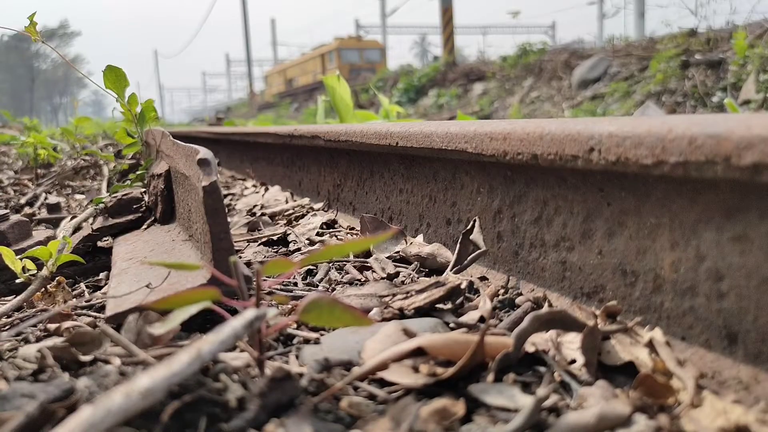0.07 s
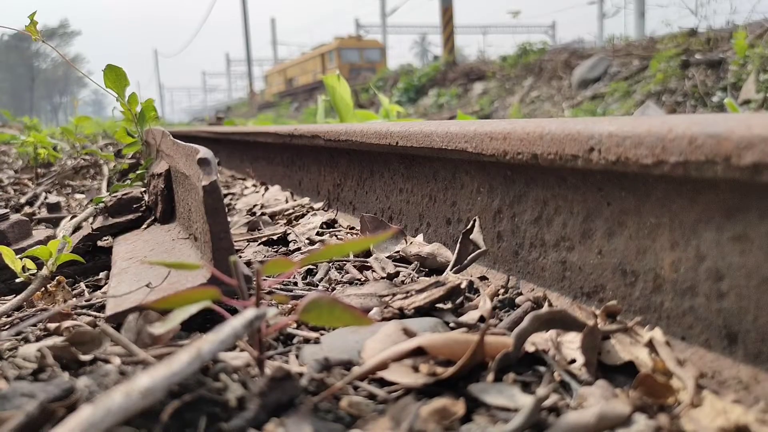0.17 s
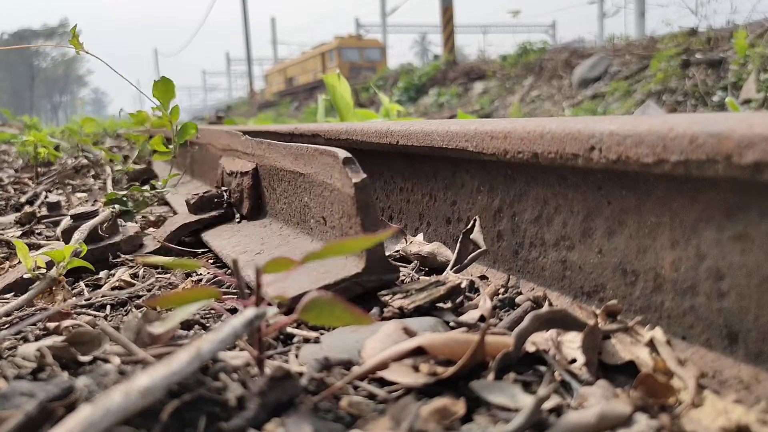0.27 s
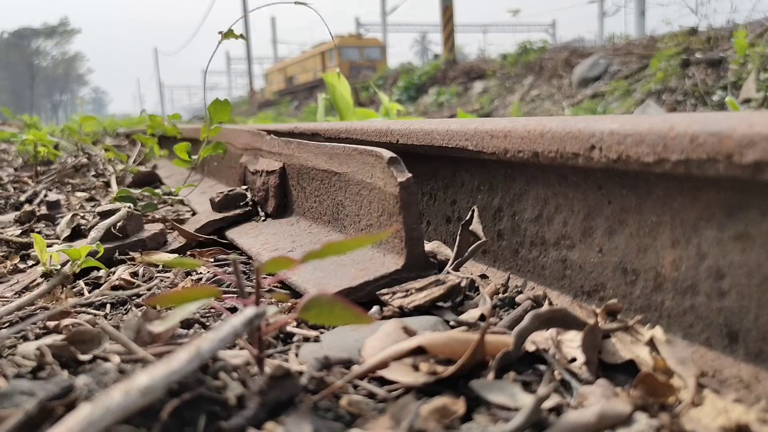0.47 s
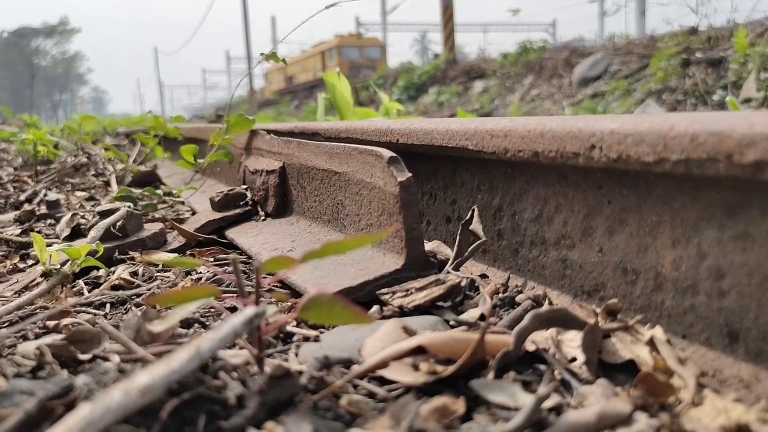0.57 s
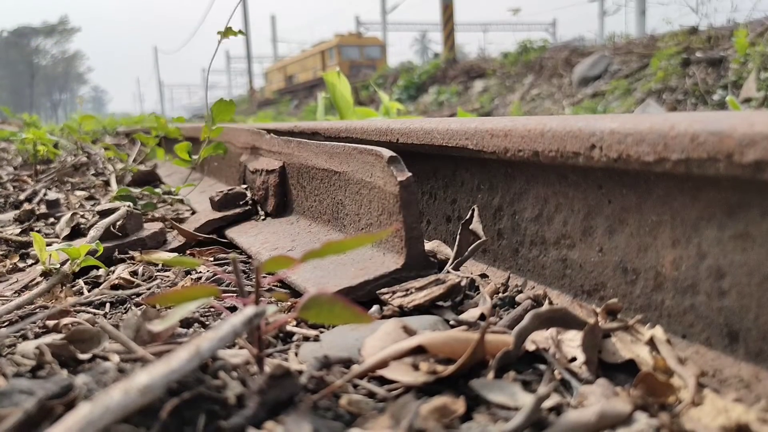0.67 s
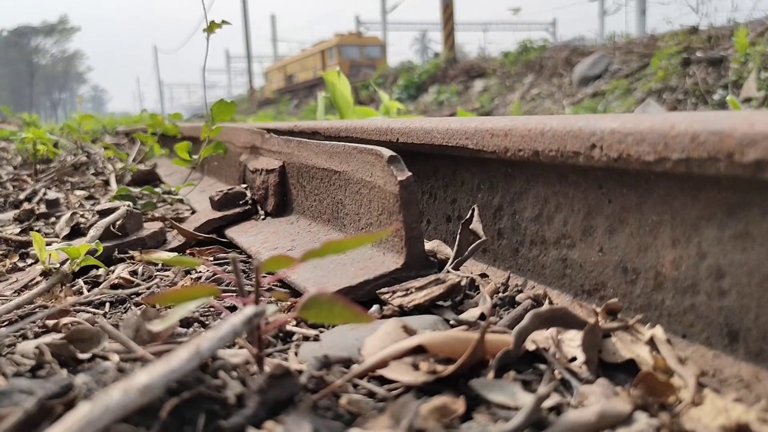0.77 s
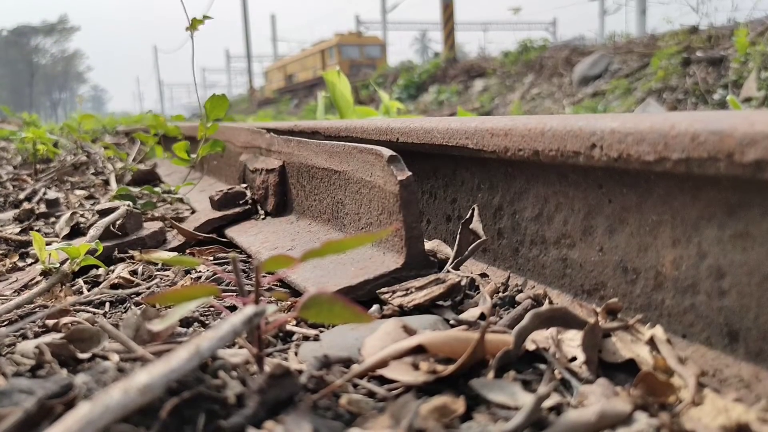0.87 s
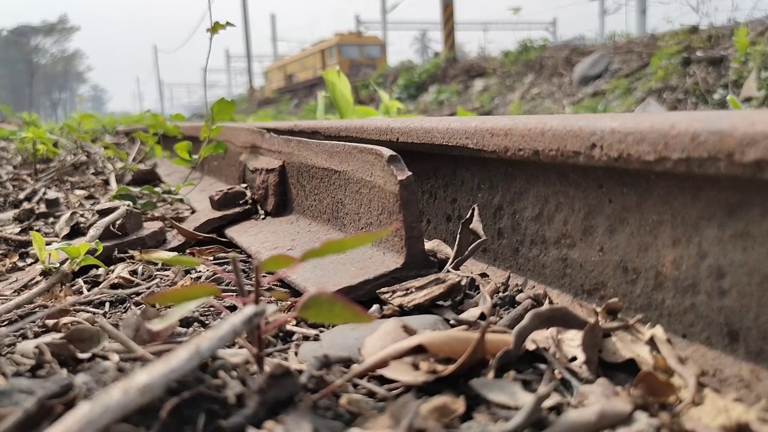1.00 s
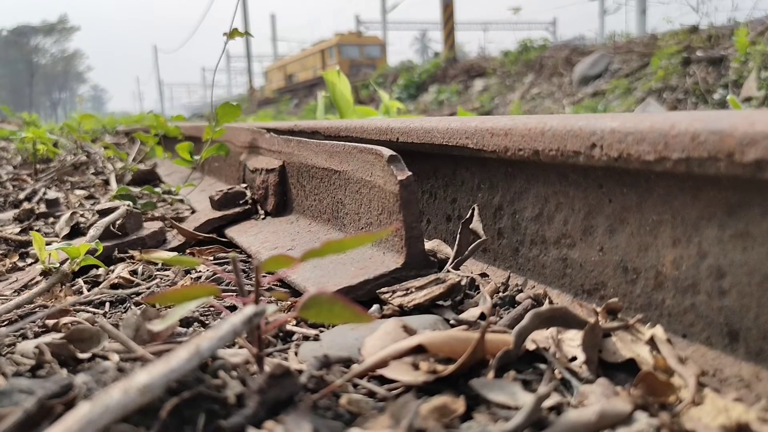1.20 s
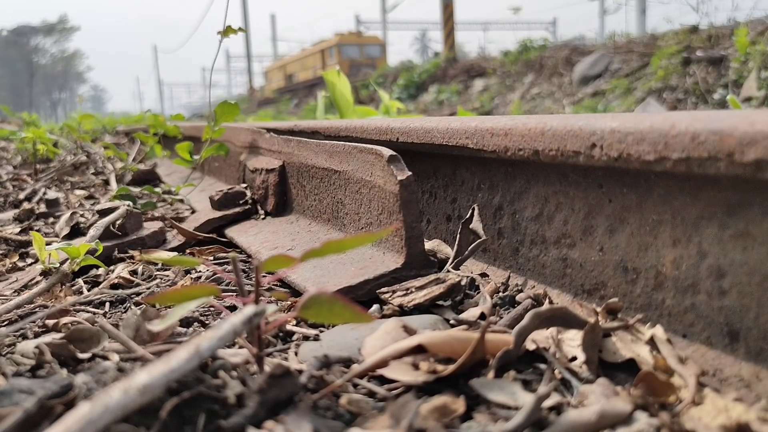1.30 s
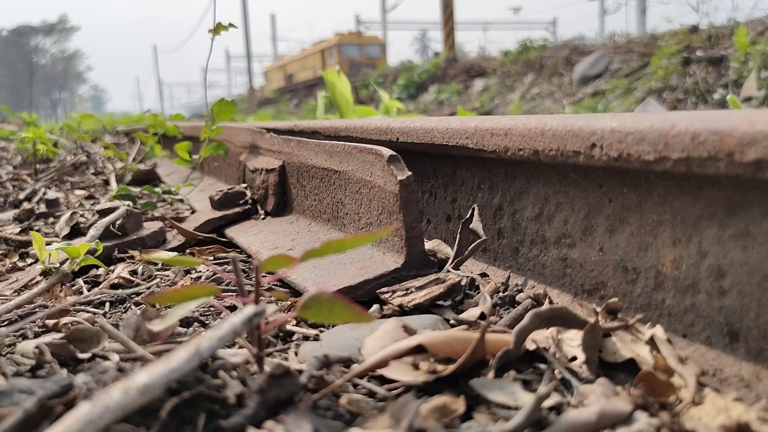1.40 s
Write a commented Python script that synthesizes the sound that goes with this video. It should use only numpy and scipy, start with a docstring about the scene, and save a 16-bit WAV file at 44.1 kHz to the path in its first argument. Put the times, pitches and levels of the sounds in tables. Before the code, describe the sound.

Metal clank and short scrape of a railway track switch shifting over, outdoors.

```python
"""Steel blade of a rusty railway switch, thrown once; heard from the ballast beside the rail.
It drags, breaks loose with a clack, judders and squeaks over its slide plates, slams home.
Each blow drives modes of blade, sleeper and rail; rust grains catch, slip and crack.
The linkage knocks softly before and after. Stones and bank scatter the sound.
Background: faint outdoor air, thin hiss, low rumble, a far drone and far chirps."""
import sys
import numpy as np
from scipy import signal
from scipy.fft import rfft, irfft
from scipy.io import wavfile
from scipy.ndimage import uniform_filter1d

SR = 44100
rng = np.random.default_rng(int(sys.argv[2]) if len(sys.argv) > 2 else 0)


def persist_wave(psi):
    """Save psi, clipped to +-1, as 16-bit WAV."""
    counts = np.round(np.clip(psi, -1, 1) * 32767).astype(np.int16)
    wavfile.write(sys.argv[1], SR, np.atleast_2d(counts).T)


N = 63945

RELEASE_S, SLAM_S = 0.2432, 0.3885
LEFT_LAG_S, COHERENCE = 0.0004953, 0.66
LAGS_S = np.array([[LEFT_LAG_S], [0]])

# Blade blows: t/s, thud level/dB, body level/dB, clang level/dB, L-R/dB (all relative)
BLOWS = [(0.2425, -41, -28, -24.5, 1.5), (0.2505, -46.5, -26, -25.5, 8), (0.2566, -35.5, -24.5, -10.5, -2),
         (0.264, -49, -32, -21, -4.5), (0.272, -18, -18.5, -12, 1), (0.276, -28, -19.5, -17.5, 3),
         (0.281, -37, -32.5, -22, -0.5), (0.289, -35.5, -22.5, -23, -1), (0.301, -20, -21.5, -21.5, 0),
         (0.313, -29.5, -28.5, -12.5, 6.5), (0.32, -22, -26, -19.5, 2.5), (0.332, -29, -27.5, -23, 4.5),
         (0.346, -22, -24, -22, -2), (0.3628, -30.5, -22.5, -29.5, -6), (0.3683, -31, -22.5, -24.5, 6),
         (0.3838, -24, -13, -36, -1.5), (0.3903, -33, -19, -25, -4.5), (0.3971, -23.5, -25, -35.5, -3),
         (0.407, -29.5, -24, -37, -4), (0.426, -35, -25, -35.5, -2), (0.438, -39, -37, -56, 0),
         (0.452, -40.5, -58, -55, 11)]
# Spectra of a blow's unpitched parts: f/Hz, relative level/dB
THUD_SPECTRUM = [(20, -47), (55, -25), (100, -8), (150, -3), (190, -9), (260, 1.5), (340, -10),
                 (600, -33.5), (2000, -79)]
BODY_SPECTRUM = [(100, -36.5), (250, -10), (380, -5.5), (540, -1.5), (700, 5.5), (790, -1.5), (1000, -7.5),
                 (1500, -35.5), (4000, -57)]
CLANG_SPECTRUM = [(300, -31), (800, -0.5), (1300, 4.5), (1850, 0), (2500, -11.5), (3200, -8), (4200, -25.5),
                  (5200, -35), (9000, -35.5), (16000, -70.5)]
# Modes of blade with sleeper, and of the rail: f/Hz, relative level/dB, t60/s
BLADE_MODES = [(107, -12.5, 0.1), (191.5, -5.5, 0.18), (259, -4.5, .13), (400, -4.5, 0.087),
               (468, -19.5, 0.31), (717, -2.5, 0.053), (790, -3, 0.059)]
RAIL_MODES = [(645, -11, .12), (679, -12.5, 0.14), (724, -17.5, .16), (786, -6, 0.064), (1158, -11, 0.069),
              (1207, -11, 0.083), (1273, -13, .07), (1330, -8, 0.18), (1505, -16, .07), (1645, -14, 0.044),
              (1735, -7, 0.064), (1820, -15.5, 0.078), (1938, -15, 0.14), (2195, -19, 0.062),
              (3110, -14.5, .06)]
# Heel landings: t/s, level/dB, f/Hz
HEEL_KNOCKS = [(0.2505, -11, 726), (0.2735, -18.5, 666), (0.3625, -11, 691), (0.3968, -15, 684.3),
               (0.4255, -23, 688)]
# Bright steel modes at release, at the slam, and lingering after it: f/Hz, level/dB, t60/s
RELEASE_MODES = [(4074, -36.5, .06), (6036, -32, .075), (6660, -23, 0.046), (7960, -34, 0.036),
                 (9000, -36, .05), (10640, -43.5, 0.048), (12130, -45, .05), (14800, -40, .04)]
SLAM_MODES = [(980, -14.5, .085), (2042, -22.5, 0.11), (2203, -21.5, 0.044), (2480, -21, .06),
              (3034, -23.5, 0.051), (3680, -37.5, 0.056), (4400, -31.5, 0.043), (6490, -25, 0.0285),
              (7304, -27, 0.026), (8250, -37, .03), (10430, -28, 0.015), (12850, -39.5, .03)]
LINGERING_MODES = [(3030, -59.5, .35), (4414, -46.5, .33), (5012, -46, .16), (6100, -54, 0.27),
                   (7270, -49, .29), (7750, -63, .27), (8140, -60, 0.3)]
# Rust crushed between steel faces: t/s, level/dB, hold/s
CRACKS = [(0.2415, -27.5, 0.004), (0.2596, -39, 0.003), (0.388, -20, 0.0034)]
# Stick-slip squeaks: t/s, length/s, f/Hz, level/dB
SQUEAKS = [(0.3455, 0.018, 980, -7.5)]
# Spectra of rust cracking, blade grinding, rust scraping: f/Hz, relative level/dB
CRACK_SPECTRUM = [(800, -13), (2500, 2), (4300, -2), (5500, -15.5), (6450, 1.5), (7000, -5.5), (8500, -8),
                  (10400, -12.5), (11200, -19.5), (15500, -24)]
GRIND_SPECTRUM = [(40, -30.5), (105, -3), (160, -14), (350, -13), (580, -8.5), (720, 5), (830, -4.5),
                  (1050, -24.5), (1300, -17), (1650, -17.5), (2300, -29.5), (2800, -57.5), (6600, -59),
                  (14000, -45.5)]
SCRAPE_SPECTRUM = [(1000, -13.5), (2500, 8), (4200, -2), (5200, -7.5), (6400, -2), (7800, -4.5),
                   (11000, -14), (13300, -9.5), (15500, -30.5)]
# Steel resonances fed by rubbing: f/Hz, half-width/Hz, relative level/dB
SING_PEAKS = [(2970, 29, 3.5), (3070, 100, -3.5), (3780, 60, -4), (4310, 30, -3), (4960, 61, -9),
              (6060, 230, -9), (6720, 36, 6.5)]
# Friction envelopes: t/s, level/dB
GRIND_ENVELOPE = [(0, -57), (0.04, -51.5), (0.07, -48.5), (0.11, -44.5), (0.16, -38), (0.19, -37.5),
                  (0.24, -34), (0.27, -62)]
SCRAPE_ENVELOPE = [(0.238, -74.5), (0.25, -32), (0.275, -38.5), (0.295, -46.5), (0.32, -47.5), (0.34, -38),
                   (0.385, -35.5), (0.41, -44.5), (0.43, -44.5), (0.5, -57.5)]
SING_ENVELOPE = [(0, -87), (0.12, -74), (0.18, -59), (0.235, -57.5), (0.26, -39), (0.34, -54), (0.41, -48),
                 (0.48, -50), (0.6, -93), (0.8, -104), (1.0, -120)]
# Linkage knocks: t/s, level/dB, f/Hz
ROD_KNOCKS = [(0.080, -43, 805), (0.088, -33.5, 750), (0.131, -36, 740), (0.162, -38.5, 775),
              (0.177, -36.5, 820), (0.732, -51, 428), (1.25, -47, 499), (1.272, -52.5, 402.4)]
# Linkage knock spectrum: multiple of pitch, relative level/dB
ROD_SPECTRUM = [(.15, -33.5), (.45, -4.5), (.75, -3), (1, 9.5), (1.3, -16), (1.7, -17.5), (2.2, -18.5),
                (3.2, -45.5), (5.5, -63.5)]
# Decay curve of scatter from ballast and bank: f/Hz, t60/s
SCATTER_T60_S = [(80, 1.1), (300, -0.02), (800, 0.6), (2000, 0.93), (4000, 0.5458), (6500, 0.52),
                 (14000, 0.42)]
# Scatter gain: f/Hz, level/dB
SCATTER_SPECTRUM = [(80, -25.5), (300, -10), (800, -34), (2000, -25.5), (4000, -19), (6500, -15.5),
                    (14000, -18.5)]
# Background spectra: f/Hz, relative level/dB
AIR_SPECTRUM = [(20, -4.5), (58, 2), (110, -8), (165, -10), (220, -8), (300, 2.5), (520, 0), (900, -13.5),
                (1900, -19.5), (2800, -41.5), (5500, -47.5), (16000, -56)]
HISS_SPECTRUM = [(2500, -40), (5600, -32), (6400, -2.5), (6900, -19.5), (7600, 3), (8700, -9), (10200, -13),
                 (10900, -29.5), (12000, -14), (13000, -18), (14400, -33), (15200, -47)]
RUMBLE_SPECTRUM = [(15, -21), (35, -0.5), (58, -4), (100, -6), (170, -17.5), (400, -49.5), (2000, -77)]
# Air balance: f/Hz, L-R/dB
AIR_BALANCE_DB = [(60, 12), (200, -2.5), (380, -0.5), (700, 13), (2400, 18), (4400, 7), (8000, -9.5),
                  (13000, 24)]
# Air likeness between channels: f/Hz, coherence
AIR_COHERENCE = [(60, 0.27), (290, 0.95), (640, 0.42), (1400, 0.059), (15000, 0.27)]
# Background envelopes: t/s, level/dB
AIR_ENVELOPE = [(0, -53.5), (.75, -56.5), (1.02, -56.5), (1.12, -55.5), (1.28, -57.5), (1.45, -52.5)]
RUMBLE_ENVELOPE = [(0, -54.5), (0.36, -66), (0.42, -39), (0.5, -53), (0.65, -62), (0.8, -59), (1.0, -64.5),
                   (1.15, -52), (1.24, -56.5), (1.35, -74.5)]
# Far chirps: t/s, length/s
CHIRPS = [(0.849, 0.031), (0.893, 0.035), (1.103, 0.045)]


def blade_blows():
    """Unpitched part of each blow: sleeper thud, hollow body, steel clang."""
    out = np.zeros((2, N))
    for start_s, thud_db, body_db, clang_db, pan_db in BLOWS:
        thud = burst(THUD_SPECTRUM, rise_s=0.0019, hold_s=0.0084, t60_s=0.081, pan_db=2, steady=0.29)
        body = burst(BODY_SPECTRUM, rise_s=0.0036, hold_s=0.0062, t60_s=0.035, pan_db=4, steady=0.46)
        clang = burst(CLANG_SPECTRUM, rise_s=0.001, hold_s=0.0018, t60_s=0.059, pan_db=0.5, steady=0.4)
        blow = amp(thud_db - 5) * thud + amp(body_db - 1) * body + amp(clang_db - 1.5) * clang
        add(out, start_s, panned(blow, pan_db))
    return out


def blade_ring(rise_s=0.0012):
    """Damped blade and sleeper modes; thud drives the low ones, body the high ones."""
    t = np.maximum(np.arange(SR // 2) / SR - LAGS_S, 0)
    attack = np.minimum(t / rise_s, 1)
    out = np.zeros((2, N))
    for hz, db, t60_s in BLADE_MODES:
        ring = attack * amp(db - 60 * t / t60_s) * np.sin(2 * np.pi * hz * t)
        for start_s, thud_db, body_db, _, pan_db in BLOWS:
            force_db = at_hz([(260, thud_db), (600, body_db)], hz)
            add(out, start_s, panned(amp(force_db) * ring, pan_db))
    return out


def rail_clank(rise_s=0.0008, spread_db=2):
    """Each blow adds energy to the rail's modes, differently at each contact point."""
    t = np.arange(N) / SR
    out = np.zeros((2, N))
    for hz, db, t60_s in RAIL_MODES:
        decay = (np.minimum(t / rise_s, 1) * amp(db - 60 * t / t60_s))[None, :SR // 2]
        energy = np.zeros((1, N))
        for start_s, _, body_db, clang_db, _ in BLOWS:
            force_db = (body_db if hz < 1000 else clang_db) + spread_db * rng.standard_normal()
            add(energy, start_s, (amp(force_db) * decay) ** 2)
        out += np.sqrt(energy) * stereo_mode(t, hz)
    return panned(out, pan_db=2.5)


def heel_knocks():
    """The blade's heel lands: short, hollow, nearly pure knocks."""
    t = np.maximum(np.arange(SR // 4) / SR - LAGS_S, 0)
    shape = strike_envelope(t, rise_s=0.003, hold_s=0.0036, t60_s=0.033)
    out = np.zeros((2, N))
    for start_s, db, hz in HEEL_KNOCKS:
        add(out, start_s, amp(db) * shape * np.sin(2 * np.pi * hz * t))
    return panned(out, pan_db=4)


def steel_ring(start_s, modes, rise_s, hold_s):
    """Bright steel modes rung by one hard contact."""
    t = np.arange(SR * 3 // 4) / SR
    out = np.zeros((2, N))
    for hz, db, t60_s in modes:
        add(out, start_s, amp(db) * strike_envelope(t, rise_s, hold_s, t60_s) * stereo_mode(t, hz))
    return out


def clacks():
    """Release and slam: steel rings, crushed rust cracks."""
    out = steel_ring(RELEASE_S, RELEASE_MODES, rise_s=0.0048, hold_s=0.00073)
    out += steel_ring(SLAM_S, SLAM_MODES, rise_s=0.0023, hold_s=0.003)
    out += steel_ring(SLAM_S, LINGERING_MODES, rise_s=0.004, hold_s=0.0052)
    for start_s, db, hold_s in CRACKS:
        crack = burst(CRACK_SPECTRUM, rise_s=0.0042, hold_s=hold_s, t60_s=0.051, pan_db=-2, steady=0.93)
        add(out, start_s, amp(db) * crack)
    return out


def squeaks(waver=0.0196):
    """Stick-slip: the blade grabs its plate and sings for a few cycles."""
    out = np.zeros((2, N))
    for start_s, length_s, hz, db in SQUEAKS:
        t = np.arange(0, length_s, 1 / SR)
        pitch_hz = hz * (1 + waver * drift(window_samples=150)[:len(t)])
        cycles = np.cumsum(pitch_hz) / SR - hz * LAGS_S
        add(out, start_s, amp(db) * np.sin(np.pi * t / length_s) * np.sin(2 * np.pi * cycles))
    return out


def friction(catches_per_s=190, slip_s=0.0063, smooth_force=0.6):
    """Rust grains catch and slip: dull grind, then bright scrape. The rubbed steel sings thinly."""
    t = np.arange(N) / SR
    catches = (rng.random(N) < catches_per_s / SR) * rng.uniform(0.5, 1, N)
    slips = signal.lfilter([1], [1, -np.exp(-1 / (slip_s * SR))], catches)
    force = unit_rms(smooth_force + slips)
    grind = panned(stereo_noise(GRIND_SPECTRUM, force), pan_db=4) * envelope(GRIND_ENVELOPE)
    scrape = stereo_noise(SCRAPE_SPECTRUM, np.sqrt(force)) * envelope(SCRAPE_ENVELOPE)
    sing = resonant_noise(SING_PEAKS) * envelope(SING_ENVELOPE)
    grinding = t < GRIND_ENVELOPE[-1][0]
    scraping = (t > SCRAPE_ENVELOPE[0][0]) & (t < SCRAPE_ENVELOPE[-1][0])
    return grind * grinding + scrape * scraping + sing


def linkage():
    """Rods knock softly on taking the load, and again on settling."""
    out = np.zeros((2, N))
    for start_s, db, hz in ROD_KNOCKS:
        spectrum = [(hz * multiple, part_db) for multiple, part_db in ROD_SPECTRUM]
        knock = burst(spectrum, rise_s=0.0015, hold_s=0.0044, t60_s=0.096, pan_db=1, steady=0.13)
        add(out, start_s, amp(db) * knock)
    return out


def scatter(x, build_s=0.005):
    """Diffuse tail from ballast and bank; each band has its own decay."""
    hz, t, noise = signal.stft(rng.standard_normal((2, SR)), SR, nperseg=256)
    fade = amp(-60 * t / at_hz(SCATTER_T60_S, hz)[:, None]) * np.minimum(t / build_s, 1)
    fade /= np.sqrt(np.mean(fade ** 2, 1, keepdims=True) * SR)
    gain = amp(at_hz(SCATTER_SPECTRUM, hz))[:, None]
    tail = signal.istft(noise * fade * gain, SR, nperseg=256)[1]
    return signal.fftconvolve(x, tail, axes=1)[:, :N]


def air(flutter_db=1.3, hiss_db=-69):
    """Low, fluttering murmur of outdoor air; thin steady hiss."""
    hz = np.fft.rfftfreq(N, 1 / SR)
    left, other = rfft(rng.standard_normal((2, N)))
    right = correlated(left, other, at_hz(AIR_COHERENCE, hz))
    tilt_db = at_hz(AIR_BALANCE_DB, hz) / 2
    pair = irfft([left * amp(tilt_db), right * amp(-tilt_db)], N)
    flutter = amp(flutter_db * drift(window_samples=1500))
    murmur = unit_rms(colour(pair, AIR_SPECTRUM)) * envelope(AIR_ENVELOPE) * flutter
    return murmur + amp(hiss_db) * unit_rms(colour(pair, HISS_SPECTRUM))


def rumble():
    """Low noise; swells after the slam and again later."""
    return stereo_noise(RUMBLE_SPECTRUM) * envelope(RUMBLE_ENVELOPE)


def drone(db=-62, hz=225, half_width_hz=17):
    """Faint, distant narrow-band drone."""
    return amp(db) * panned(resonant_noise([(hz, half_width_hz, 0)]), pan_db=-5)


def chirps(db=-77, hz=4800, half_width_hz=130):
    """Thin, far chirps: brief swells of narrow-band noise."""
    t = np.arange(N) / SR
    swells = sum(np.sin(np.pi * np.clip((t - start_s) / length_s, 0, 1)) for start_s, length_s in CHIRPS)
    return amp(db) * swells * resonant_noise([(hz, half_width_hz, 0)])


def burst(spectrum, rise_s, hold_s, t60_s, pan_db, steady):
    """Dense damped modes from one contact, as noise; steady (0-1) flattens their beating."""
    t = np.arange(8192) / SR
    shape = strike_envelope(t, rise_s, hold_s, t60_s)
    modes = signal.hilbert(stereo_noise(spectrum, size=len(t)))
    beats = np.sqrt(uniform_filter1d(unit_rms(abs(modes)) ** 2, size=45) + 1e-3)
    ring = modes.real / beats ** steady * shape
    return panned(unit_rms(ring) * np.sqrt(np.mean(shape ** 2)), pan_db)


def stereo_mode(t, hz, offset_rad=1):
    """One mode in stereo: left late; a phase offset of random sign between channels widens it."""
    phase = 2 * np.pi * rng.random() + offset_rad * rng.choice([-1, 1]) * np.array([[1], [0]])
    return np.sin(2 * np.pi * hz * (t - LAGS_S) + phase)


def stereo_noise(spectrum, drive=1, size=N):
    """Noise modulated by drive, then coloured; rms 1."""
    return unit_rms(spaced(colour(drive * rng.standard_normal((2, size)), spectrum)))


def resonant_noise(peaks):
    """Noise in narrow resonances; rms 1."""
    f = np.fft.rfftfreq(N, 1 / SR)
    gain = sum(amp(db) / (1 + ((f - hz) / half_width_hz) ** 4) for hz, half_width_hz, db in peaks)
    return unit_rms(spaced(irfft(rfft(rng.standard_normal((2, N))) * gain, N)))


def spaced(pair):
    """Makes two independent signals partly coherent, left late."""
    left, other = rfft(pair)
    size = pair.shape[1]
    delay = np.exp(-2j * np.pi * np.fft.rfftfreq(size, 1 / SR) * LEFT_LAG_S)
    return irfft([left * delay, correlated(left, other, COHERENCE)], size)


def correlated(x, other, coherence):
    """Equal-power blend with the given coherence to x."""
    return coherence * x + np.sqrt(1 - coherence ** 2) * other


def drift(window_samples):
    """Smoothed noise; rms 1."""
    return unit_rms(uniform_filter1d(rng.standard_normal(N), size=window_samples))


def strike_envelope(t, rise_s, hold_s, t60_s):
    """Linear rise, hold, exponential decay."""
    return np.minimum(t / rise_s, 1) * amp(-60 * np.maximum(t - rise_s - hold_s, 0) / t60_s)


def envelope(points):
    """Gain over the scene from t/s, level/dB points."""
    return amp(np.interp(np.arange(N) / SR, *np.transpose(points)))


def colour(x, spectrum):
    """Filters by f/Hz, level/dB points."""
    size = x.shape[-1]
    return irfft(rfft(x) * amp(at_hz(spectrum, np.fft.rfftfreq(size, 1 / SR))), size)


def at_hz(points, hz):
    """Table lookup on a log-frequency axis."""
    f, value = np.transpose(points)
    return np.interp(np.log(hz + 1), np.log(f + 1), value)


def add(mix, start_s, sound):
    """Mixes a sound in at start_s."""
    part = mix[:, round(start_s * SR):][:, :sound.shape[1]]
    part += sound[:, :part.shape[1]]


def panned(x, pan_db):
    """Tilts a pair left by pan_db."""
    return x * amp([[pan_db / 2], [-pan_db / 2]])


def unit_rms(x):
    """Scales to rms 1."""
    return x / np.sqrt(np.mean(x ** 2) + 1e-20)


def amp(db):
    """dB to gain."""
    return 10 ** (np.asarray(db) / 20)


def scene():
    """Switch, scatter, background."""
    struck = blade_blows() + blade_ring() + rail_clank() + heel_knocks()
    switch = struck + clacks() + squeaks() + friction() + linkage()
    return switch + scatter(switch) + air() + rumble() + drone() + chirps()


def record(dry):
    """Low cut, soft clip, band limit."""
    low_cut_hz, ceiling, high_cut_hz = 64, 0.6, 15900
    trimmed = signal.lfilter(*signal.butter(2, low_cut_hz, "high", fs=SR), dry)
    rounded = trimmed / (1 + (trimmed / ceiling) ** 4) ** (1 / 4)
    lowpass = signal.firwin(511, high_cut_hz, window=("kaiser", 9), fs=SR)
    return signal.oaconvolve(rounded, lowpass[None], "same")


dry = scene()
out = record(dry)
persist_wave(out)
```